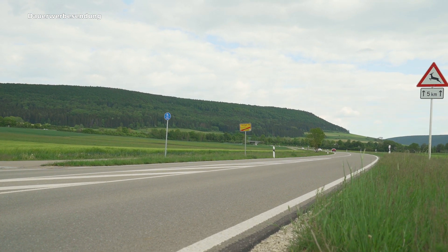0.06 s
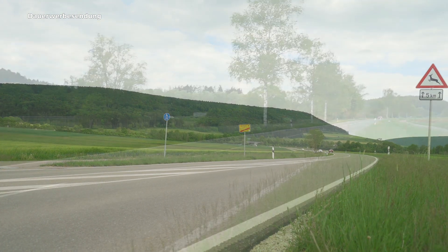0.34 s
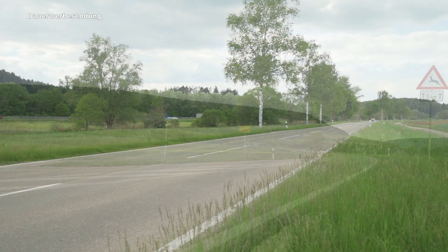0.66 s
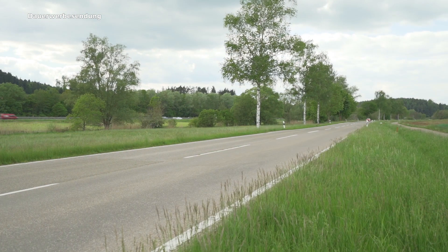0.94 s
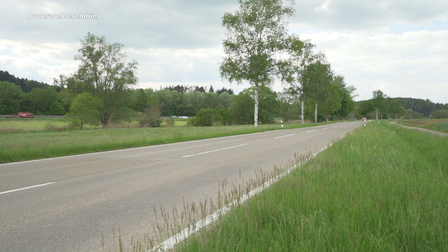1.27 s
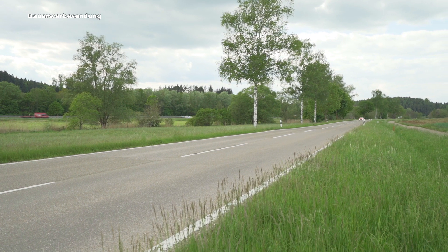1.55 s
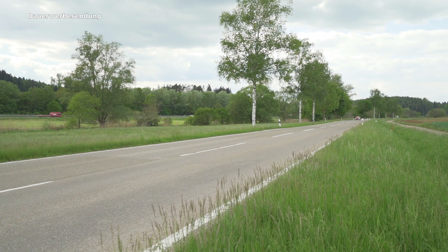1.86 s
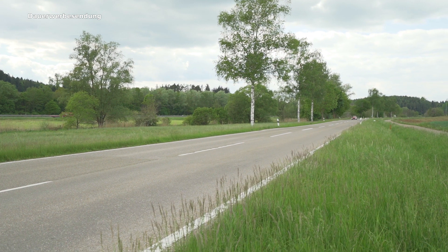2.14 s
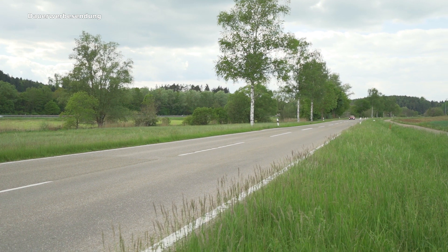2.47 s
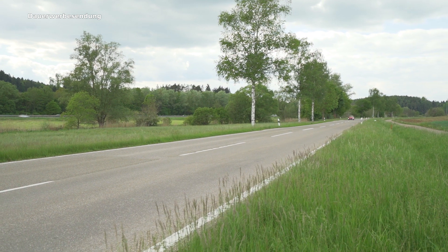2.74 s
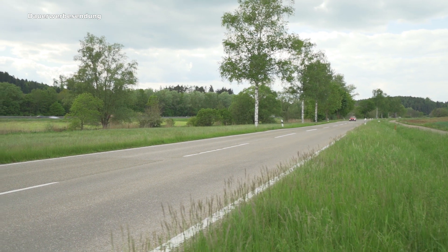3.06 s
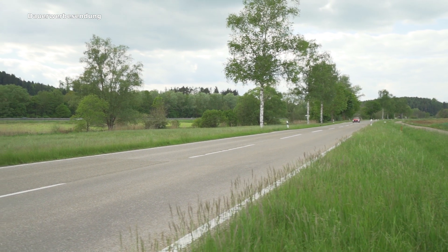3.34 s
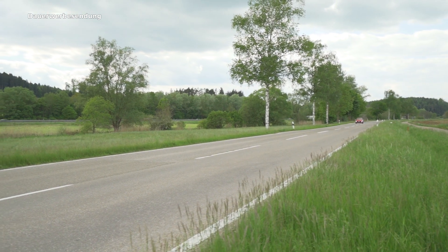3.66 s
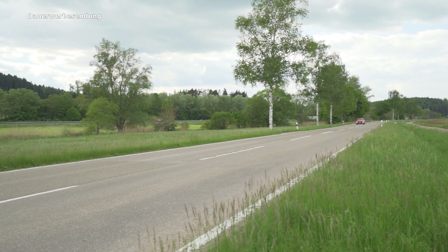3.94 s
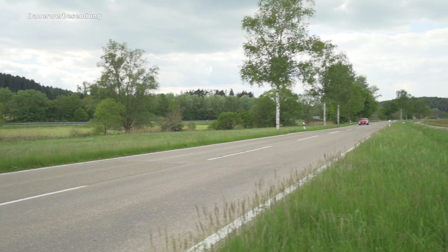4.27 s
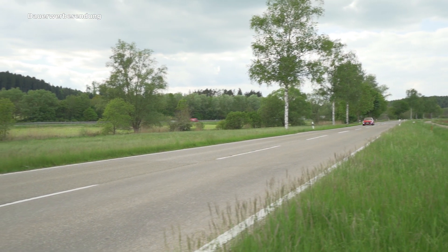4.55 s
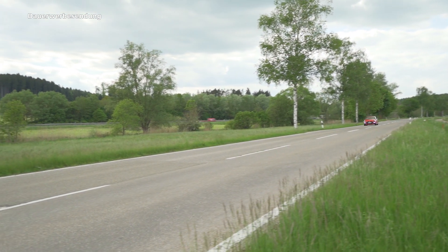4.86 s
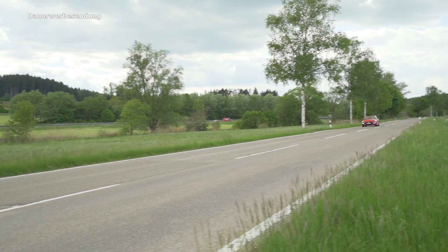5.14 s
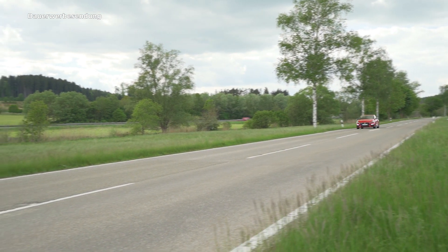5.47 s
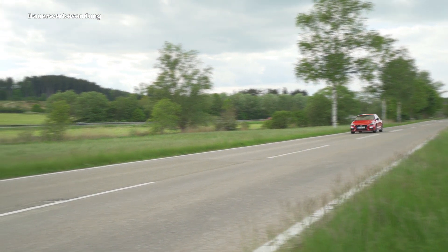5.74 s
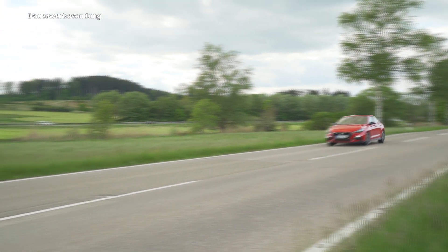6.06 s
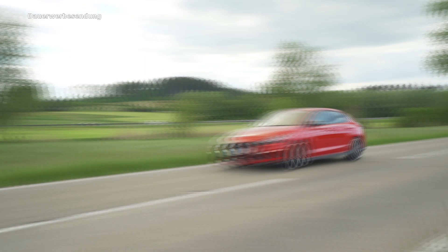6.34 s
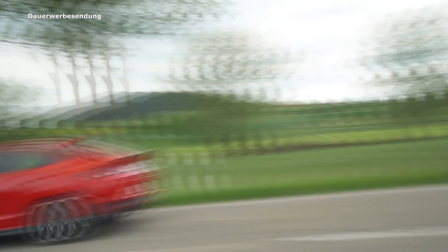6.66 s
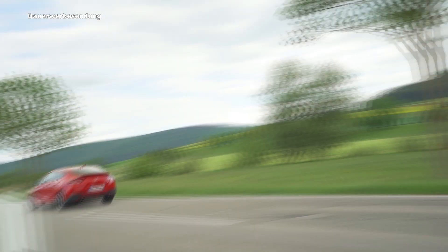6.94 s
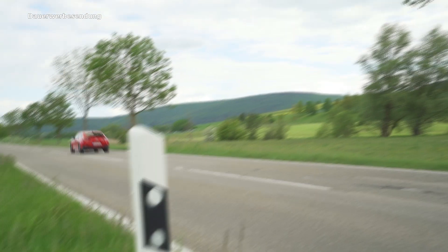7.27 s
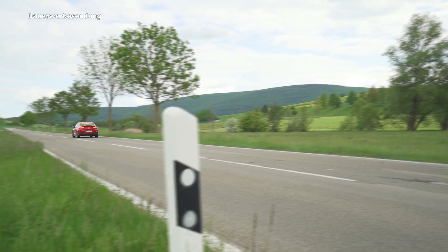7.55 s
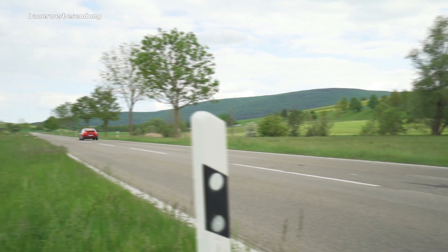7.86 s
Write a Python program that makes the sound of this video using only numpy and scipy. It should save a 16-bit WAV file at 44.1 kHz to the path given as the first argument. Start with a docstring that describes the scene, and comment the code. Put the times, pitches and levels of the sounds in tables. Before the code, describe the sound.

At the start, the soft drone and tyre noise of a receding car fade away within about a second. A low breeze rumbles throughout over the open country road, with a few tiny dry ticks near the microphone between 1.5 and 3 seconds. From about 2 seconds a second car approaches, faint at first, its engine note climbing as it accelerates. Its tyre roar swells strongly from around 5 seconds, slightly to the right. At 6.6 seconds it passes very close, with a loud rush and a short, deep boom of pushed air. The exhaust blares briefly and gives two sharp cracks in quick succession at about 6.7 and 6.8 seconds as the car shifts up. The engine note and tyre whine drop in pitch, and the car recedes slightly to the left, still audible at nearly 8 seconds.

```python
"""Country road drive-past

A turbocharged four-cylinder car accelerates, passes close by at 6.6 s in a boom of pushed air, shifts up
with two double exhaust cracks and drives off. Its tyres roar; tread tones and exhaust note fall with
the Doppler shift. At the start an earlier car fades out. A breeze rumbles throughout, with a few faint
ticks nearby. An automatic gain control ducks the loud pass."""
import sys
import numpy as np
from scipy import signal
from scipy.fft import rfft, irfft, next_fast_len
from scipy.io import wavfile
from scipy.ndimage import uniform_filter1d, minimum_filter1d, map_coordinates

SR = 44100
rng = np.random.default_rng(int(sys.argv[2]) if len(sys.argv) > 2 else 0)


def master_out(mix):
    """Clip the mix to full scale and print it as 16-bit PCM to the path in sys.argv[1]."""
    frames = np.transpose(np.atleast_2d(mix))
    ceiling = np.clip(frames, -1, 1)
    pcm = np.round(ceiling * 32767).astype(np.int16)
    wavfile.write(sys.argv[1], SR, pcm)


N = 348831
PASS_S, SPEED_M_PER_S, NEAREST_M = 6.604, 26, 5.066  # the car's straight path past the listener
# pan of the cars: t/s, bearing (positive is left)
BEARING = [(0.0, -3), (0.33, -4.5), (1.08, 6), (2.24, 2.5), (2.35, 2.5), (5.99, -5.5), (6.47, -4),
           (6.65, 2), (7.9, 1)]


def amp(db):
    """Decibels to gain."""
    return 10 ** (np.asarray(db) / 20)


def unit(x):
    """x at rms 1."""
    return x / np.sqrt(np.mean(x ** 2) + 1e-20)


def along(points, hz):
    """(f/Hz, value) points read on a log axis."""
    f, v = np.transpose(points)
    return np.interp(np.log(hz + 1), np.log(f + 1), v)


def curves(rows, t):
    """Each column after the time, read at times t."""
    s, *cols = np.transpose(rows)
    return [np.interp(t, s, c) for c in cols]


def swell(t, at_s, width_s):
    """A bell-shaped rise and fall, peaking at 1."""
    return np.exp(-((t - at_s) / width_s) ** 2)


def wobble(rate):
    """A smooth random curve, rate knots a second."""
    return map_coordinates(rng.standard_normal(int(N * rate / SR) + 4), [np.arange(N) * rate / SR])


def band(x, lo_hz, hi_hz):
    """Causal band-pass."""
    sos = signal.butter(2, [lo_hz, min(hi_hz, .48 * SR)], 'band', fs=SR, output='sos')
    return signal.sosfilt(sos, x)


def noise_pair(coherence, patchy_db, size=2048):
    """Frequencies, times and short-time spectra of partly alike stereo noise with drifting patches."""
    hz, t, (a, b) = signal.stft(rng.standard_normal((2, N)), SR, nperseg=size, noverlap=size * 3 // 4)
    turn = np.arccos(np.clip(along(coherence, hz), -1, 1))[:, None] / 2
    mid, side = np.cos(turn) * a, np.sin(turn) * b
    patches = uniform_filter1d(rng.standard_normal(a.shape), size=14, axis=0)
    patches = uniform_filter1d(patches, size=8, axis=1)
    return hz, t, np.array([mid + side, mid - side]) * amp(patchy_db * unit(patches))


def to_sound(z, size=2048):
    """Short-time spectra back to samples."""
    return signal.istft(z, SR, nperseg=size, noverlap=size * 3 // 4)[1][:, :N]


def distance(t):
    """Metres between car and listener."""
    return np.hypot(SPEED_M_PER_S * (PASS_S - t), NEAREST_M)


def heading(t):
    """1 while the car points at the listener, 0 abreast, -1 as it drives away."""
    return SPEED_M_PER_S * (PASS_S - t) / distance(t)


def doppler(t):
    """Pitch factor from the rate at which the distance changes."""
    return 1 / (1 + np.gradient(distance(t), t) / 343)


def open_air(t, air_db=-41, breeze_db=-40.5):
    """A wide outdoor bed and the uneven rumble of a breeze that rises early and eases after the pass."""
    # likeness of left and right: f/Hz, coherence
    diffuse = [(100, 1), (500, 0.94), (1200, 0.13), (2400, .1), (6000, .05)]
    # spectrum of breeze, far traffic and microphone hiss: f/Hz, relative level/dB
    bed = [(15, -42), (28, -21), (60, -6), (110, -6), (160, -9), (230, -12.5), (400, -21.5), (1100, -9),
           (2300, -14.5), (3200, -23), (5000, -33.5), (8000, -40), (16000, -43)]
    hz, frame_t, noise = noise_pair(diffuse, patchy_db=0)
    calm_db = along([(150, -12), (500, -2)], hz[:, None]) * np.clip(1 - frame_t / 0.37, 0, 1)
    air = unit(to_sound(noise * amp(along(bed, hz)[:, None] + calm_db)))
    rumble = unit(band(rng.standard_normal(N), 55, 114) * amp(2.2 * wobble(12)))
    strength = np.interp(t, [0, .7, 6.6, 7.2], [.1, .94, .9, .2])
    return amp(air_db) * air + amp(breeze_db) * strength * rumble


def exhaust(t, firing_hz, db, orders, flutter_db, jitter, rasp=0.087):
    """Orders of the firing rate flutter in turbulent air, and every firing puffs a little noise."""
    churn = 1 + 1.25 * swell(t, PASS_S, .22)  # roughest while the car's wake crosses the verge
    phase = 2 * np.pi * np.cumsum(firing_hz * (1 + jitter * churn * wobble(40))) / SR
    note = np.zeros(N)
    for order, level_db in orders:
        gain = amp(level_db + flutter_db * churn * wobble(22))
        note += gain * np.sin(order * phase + rng.uniform(0, 2 * np.pi))
    puffs = unit(band(rng.standard_normal(N), 130, 990) * (1 + np.cos(phase)) ** 2)
    return amp(db) * (np.sqrt(2) * note + rasp * puffs)


def earlier_engine(t):
    """The earlier car's cruising drone sags a little in pitch as it fades."""
    # the receding drone: t/s, firing rate/Hz, level/dB
    drone = [(0, 105.8, -45.5), (.35, 105, -48.5), (.75, 103.4, -53), (1.1, 102, -71)]
    # exhaust timbre at a cruise: multiple of the firing rate, relative level/dB
    cruising = [(1, -0.5), (1.5, -3), (2, -13), (3, -1.5), (4, -2.5)]
    firing_hz, db = curves(drone, t)
    return exhaust(t, firing_hz, db, cruising, flutter_db=0.5, jitter=0.0034)


def earlier_fade(t, start_s=0.55, length_s=0.79):
    """Crossfade from the earlier car (1) to the approaching one (0)."""
    return np.clip(1 - (t - start_s) / length_s, 0, 1)


def tyre_colour(hz, t, whine_hz=1115, whine_width_hz=32):
    """Gain by frequency and time: the car is heard nose first, then tail, as its tread tones slide down."""
    # tyre spectra from five points of the pass, each: f/Hz, relative level/dB
    distant = [(30, -20), (100, -6.5), (250, -4), (550, -3.5), (850, 1), (1080, 5), (1250, -2.5), (1700, 2),
               (1950, -7.5), (2300, -9), (3000, -23), (4500, -32), (8000, -54)]
    ahead = [(30, -29), (110, -4), (180, 2), (300, -3.5), (540, -7), (680, -3), (1200, -2), (1650, -5),
             (2000, -16.5), (2400, -15), (3000, -23.5), (6000, -29.5), (8000, -33), (14000, -63)]
    near = [(30, -32), (90, -9), (200, -1), (330, -5), (560, -6), (700, -2.5), (1250, 1), (1650, 2),
            (1950, -7), (2400, -4.5), (3400, -13.5), (5000, -20), (7500, -26.5), (15000, -38.5)]
    abreast = [(30, -30), (90, 2.5), (170, 9), (320, -0.5), (550, -3.5), (740, -4.5), (1000, -0.5),
               (1500, -4.5), (2000, -7.5), (2500, -10), (4000, -18.5), (7000, -25), (12000, -35),
               (16000, -34)]
    behind = [(30, -41), (90, -13.5), (170, -12), (280, -15), (480, -17), (680, -7), (1050, 1.5),
              (1500, -2.5), (2300, -10), (3200, -22), (5500, -27.5), (8000, -37), (12000, -40.5),
              (16000, -43)]
    # tread resonances before the Doppler shift: f/Hz, level/dB at depth 1
    tread = [(760, 0.5), (880, -6), (1020, 3), (1130, 4), (1230, -1.5), (1330, -13.5), (1460, 4.5),
             (1620, 2), (1800, 0.5), (2050, 1), (2250, -1.5), (2480, -1), (2900, -3)]
    views = [distant, distant, ahead, ahead, near, near, abreast, abreast, behind]
    times = [0, 1.5, 4.7, 5.4, 5.8, 6.4, 6.54, 6.7, 6.86]
    spectra = np.transpose([along(view, hz) for view in views])
    colour_db = np.array([np.interp(t, times, row) for row in spectra])
    ring_ahead, ring_behind, ring_earlier = 0.28, 1.13, .5  # how plainly the tread rings
    depth = ring_ahead + (ring_behind - ring_ahead) * np.minimum(heading(t), 0) ** 2
    depth += (ring_earlier - ring_ahead) * earlier_fade(t)
    emitted_hz = hz[:, None] / doppler(t)
    # the grooves of the tread whine narrowly towards the front
    facing = np.interp(t, [1, 3.5, 5.3, PASS_S], [.3, 0.96, 0.8, 0.22])
    whine_db = 3 * facing * np.exp(-((emitted_hz - whine_hz) / whine_width_hz) ** 2)
    return amp(colour_db + depth * along(tread, emitted_hz) + whine_db)


def tyre_levels(t, grass_m=24.7, grass_edge_m=5.2):
    """dB of body, roar and hiss: they fall with distance, beam along the road and are muffled by grass."""
    # body, roar, hiss: level at 10 m/dB, loss per doubling/dB, gain ahead/dB, gain behind/dB,
    # loss through grass/dB, earlier car's level/dB
    layers = [(-18, 8, 0.04, 0.5, 0.5, -44.5), (-12.5, 6, 3.5, 7, 9, -37), (-24, 6, 0.5, -1, 16.5, -57.5)]
    # brief surges of tyre noise: t/s, width/s, body/dB, roar/dB, hiss/dB
    surges = [(3.65, .25, 0, 1.3, .5), (4.8, .14, 0, 4.5, 1.5), (5.7, 0.39, 2.5, 1, 0.5),
              (6.28, .17, -1.5, 2, 0), (6.53, 0.047, 2, 1.5, 3.5), (7.36, 0.23, 1, 3.5, 1.5)]
    doublings, aim = np.log2(distance(t) / 10), heading(t)
    # verge grass screens the approaching car until it is grass_m up the road
    hidden = (1 + np.tanh((aim * distance(t) - grass_m) / grass_edge_m)) / 2
    lifts = sum(np.outer(dbs, swell(t, s, width)) for s, width, *dbs in surges)
    levels = []
    for (db, spread_db, ahead_db, behind_db, grass_db, earlier_db), lift_db in zip(layers, lifts):
        beam_db = np.where(aim > 0, ahead_db, behind_db) * aim ** 2
        car = amp(db - spread_db * doublings + beam_db - grass_db * hidden + lift_db)
        levels.append(20 * np.log10(np.hypot(car, amp(earlier_db) * earlier_fade(t))))
    return levels


def treble_comb(f, t, ahead_ms=1.337, behind_ms=2.08):
    """Close by, the treble has a comb-like ripple that slides down as the car goes past."""
    close = np.clip(28 / distance(t), 0, 1) ** 2
    depth = 0.34 * close * along([(1500, 0.051), (2600, 0.91), (5000, 0.99), (10000, 0.41)], f)
    delay_s = np.interp(heading(t), [-.8, .7], [behind_ms, ahead_ms]) / 1000
    return np.abs(1 + depth * np.exp(-2j * np.pi * f * delay_s))


def microphone_pair(f, t):
    """Left and right gains: the housing shades the far microphone, which also hears the car later."""
    bearing, = curves(BEARING, t)
    shade = along([(150, 0.069), (500, 0.58), (1200, 1.22), (3500, 1.26), (8000, 1.84), (14000, 1.6)], f)
    lag_scale = along([(150, 1.6), (500, 1), (1200, .55), (2400, .85), (4000, .9), (8000, 1)], f)
    lag_s = .000095 * np.tanh(bearing / 3) * lag_scale
    left = amp(bearing * shade / 2) * np.exp(1j * np.pi * f * lag_s)
    colour_db = along([(100, 0.1), (400, -.5), (1200, -0.4), (2500, -0.63), (4500, 0.9), (8000, 2.5)], f)
    return amp(colour_db) * np.array([left, 1 / left])


def tyres():
    """Tyre roar and rush of air from both cars, dulled by distance."""
    # likeness of left and right: f/Hz, coherence
    direct = [(40, .93), (110, .982), (500, .98), (1200, .96), (2400, .87), (4200, .68), (7000, .45),
              (12000, .4)]
    hz, t, noise = noise_pair(direct, patchy_db=1.04)
    f = hz[:, None]
    absorbed_db = 0.5 * np.minimum(distance(t), 28) * np.minimum(f / 10000, 1.25) ** 2
    gain = tyre_colour(hz, t) * treble_comb(f, t) * amp(-absorbed_db)
    # a three-band EQ rides body, roar and hiss towards their own level curves
    bands_hz = [(230, 650), (700, 2200), (3000, 9000)]
    powers = [np.sum(gain[(hz > lo) & (hz < hi)] ** 2, axis=0) / len(hz) for lo, hi in bands_hz]
    body_db, roar_db, hiss_db = np.array(tyre_levels(t)) - 10 * np.log10(powers)
    low, high = along([(520, 1), (850, 0.3)], f), along([(1800, 0), (3200, 0.75)], f)
    gain *= amp(low * body_db + (1 - low - high) * roar_db + high * hiss_db)
    return to_sound(noise * gain * microphone_pair(f, t))


def engine(t, tailpipe_db=11.5, boom_db=10.5):
    """The passing car's note: Doppler-shifted, louder from behind, booming through the gear change."""
    # revs climb, drop into the next gear and hold: t/s, firing rate/Hz
    revs = [(1.9, 141.4), (4, 167.3), (5.6, 184.6), (6.5, 194), (6.72, 178.7), (6.79, 163.8), (7.2, 133.7),
            (7.35, 136.9), (7.91, 134.9)]
    # exhaust timbre under load: multiple of the firing rate, relative level/dB
    pulling = [(.5, -35), (1, -1), (1.5, -23.5), (2, -19.5), (2.5, -23), (3, -19.5)]
    boom_s, attack_s, hold_s, release_s = 6.383, 0.31, 0.34, 0.48
    since = t - boom_s
    boom = np.clip(since / attack_s, 0, 1) * np.exp(-np.maximum(since - attack_s - hold_s, 0) / release_s)
    front_db = -28 - 6 * np.log2(distance(t) / 10)
    db = front_db + tailpipe_db * (1 - heading(t)) / 2 + boom_db * boom
    firing_hz, = curves(revs, t)
    note = exhaust(t, firing_hz * doppler(t), db, pulling, flutter_db=1.7, jitter=0.0065)
    return (1 - earlier_fade(t)) * note


def ticks(decay_s=.004):
    """Tiny dry ticks close to the microphone."""
    # bright snaps: t/s, peak level/dB, centre f/Hz, bandwidth/Hz
    snaps = [(1.598, -43, 6400, 700), (1.6955, -27.5, 11000, 8000), (1.7145, -40, 10000, 6000),
             (2.073, -44, 6500, 2500), (2.114, -43, 7000, 3500), (2.639, -43, 9000, 3000),
             (3.008, -45, 6500, 2000)]
    out, t = np.zeros(N), np.arange(SR // 30) / SR
    for s, db, hz, width in snaps:
        snap = (t == 0) + .15 * rng.standard_normal(len(t)) * amp(-60 * t / decay_s)
        tick = band(snap, hz - width / 2, hz + width / 2)
        out[round(s * SR):][:len(t)] += amp(db) * tick / np.abs(tick).max()
    return out


def wake(t, at_s=6.648, width_s=0.046, hz=90, db=-1.5, buffet=0.31):
    """Air pushed aside by the car lands as one short boom and buffets each microphone separately."""
    boom = np.sin(2 * np.pi * hz * (t - at_s))
    eddies = unit(band(rng.standard_normal((2, N)), 55, 180))
    return amp(db) * swell(t, at_s, width_s) * (boom + buffet * eddies)


def blare(t, at_s=6.72, width_s=0.053, db=-7):
    """The tailpipe swings towards the listener and blares just before the shift."""
    return amp(db) * swell(t, at_s, width_s) * unit(band(rng.standard_normal(N), 640, 790))


def cracks(push_s=0.0016, rasp=0.37):
    """Unburnt fuel fires in the pipe: a pressure push and a short rasp."""
    # two close pairs of bangs at the gear change: t/s, gain/dB, rasp's 60 dB decay/s
    bangs = [(6.7338, 9.5, 0.015), (6.7407, 18, 0.036), (6.782, 16.5, 0.026), (6.7921, 10, 0.027)]
    out, t = np.zeros(N), np.arange(SR // 8) / SR
    push = (1 - t / push_s) * np.exp(-t / push_s)
    for s, db, decay_s in bangs:
        burst = unit(band(rng.standard_normal(len(t)), 370, 1500)) * amp(-60 * t / decay_s)
        out[round(s * SR):][:len(t)] += amp(db) * band(push + rasp * burst, 60, 2000)
    return out


def gain_control(x, hold_db=-10, attack_s=0.04, release_db_per_s=8):
    """Loud sound is turned down to a steady level; the gain comes back slowly."""
    keep = np.exp(-1 / (attack_s * SR))
    power = signal.lfilter([1 - keep], [1, -keep], np.mean(x ** 2, axis=0))
    over_db = 10 * np.log10(np.maximum(power / amp(hold_db) ** 2, 1))
    recovery = release_db_per_s * np.arange(N) / SR
    return x * amp(recovery - np.maximum.accumulate(over_db + recovery))


def limiter(x, release_db_per_s=95):
    """The gain drops at once under a peak above full scale, then recovers."""
    over_db = 20 * np.log10(np.maximum(np.abs(x).max(axis=0), 1))
    recovery = release_db_per_s * np.arange(N) / SR
    cut_db = np.maximum.accumulate(over_db + recovery) - recovery
    return x * amp(uniform_filter1d(minimum_filter1d(-cut_db, size=32), size=32))


def scene():
    """Both cars in the open field, in stereo."""
    t = np.arange(N) / SR
    bearing, = curves(BEARING, t)
    # deep tones bend round the microphone housing and lean only a little to one side
    lean = amp(0.09 * np.array([bearing, -bearing]))
    earlier = earlier_engine(t)
    road_and_air = tyres() + open_air(t)
    exhausts = earlier + engine(t) + blare(t) + cracks()
    return road_and_air + lean * exhausts + wake(t) + ticks()


def record(dry, top_hz=15900):
    """Gain riding, peak limiting and a steep cut of the highest treble."""
    levelled = limiter(gain_control(dry))
    size = next_fast_len(N + SR // 2)
    passband = np.fft.rfftfreq(size, 1 / SR) < top_hz
    return irfft(rfft(levelled, size) * passband, size)[:, :N]


dry = scene()
out = record(dry)
master_out(out)
```